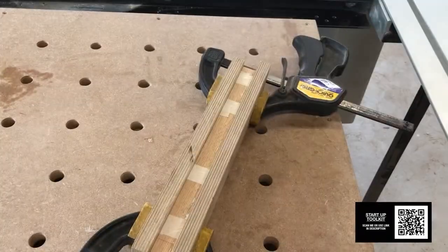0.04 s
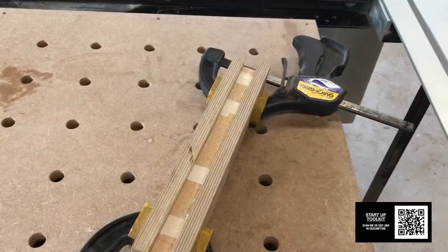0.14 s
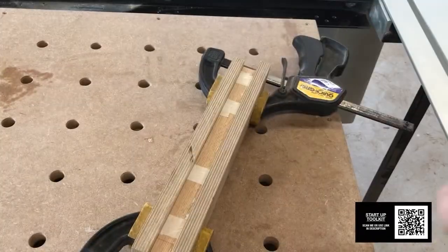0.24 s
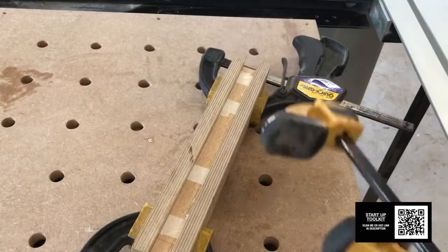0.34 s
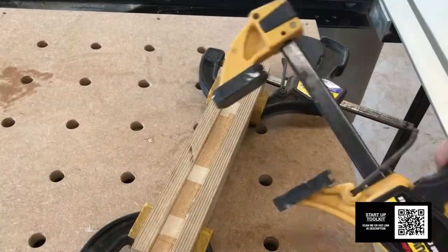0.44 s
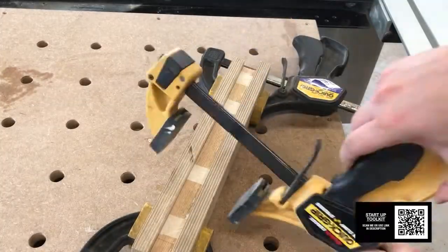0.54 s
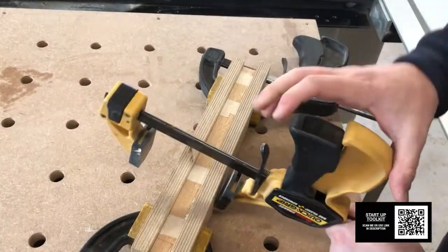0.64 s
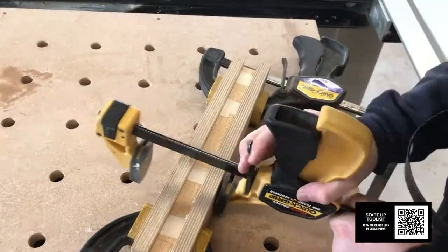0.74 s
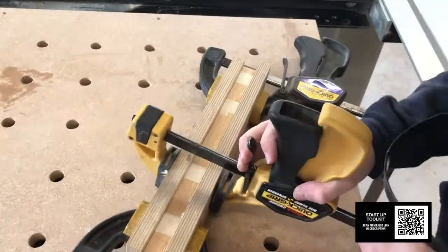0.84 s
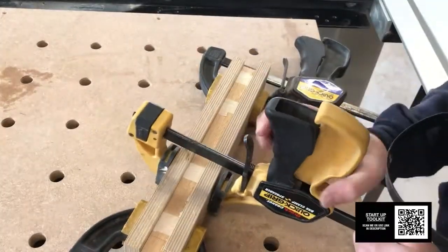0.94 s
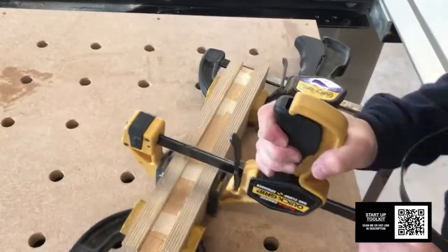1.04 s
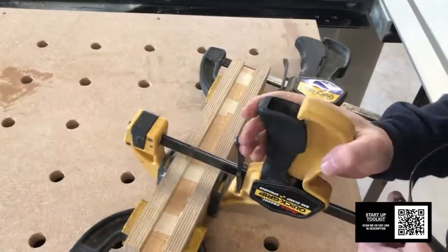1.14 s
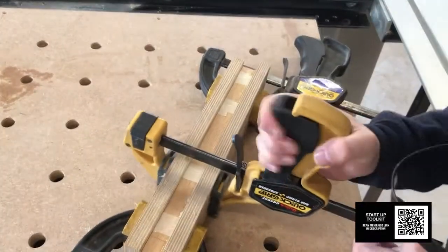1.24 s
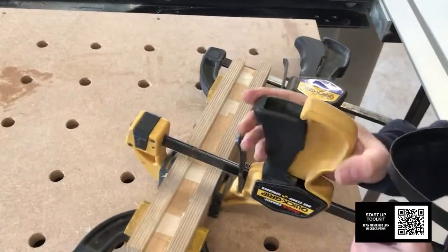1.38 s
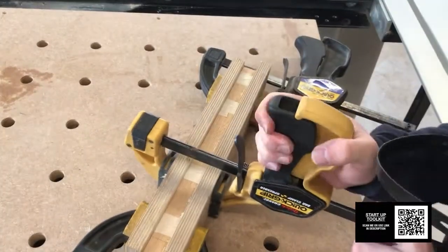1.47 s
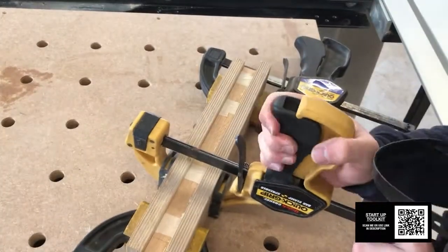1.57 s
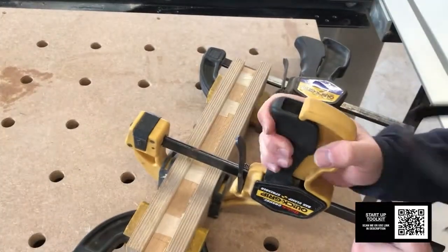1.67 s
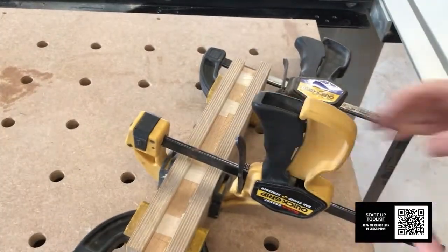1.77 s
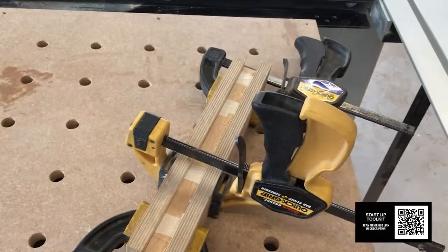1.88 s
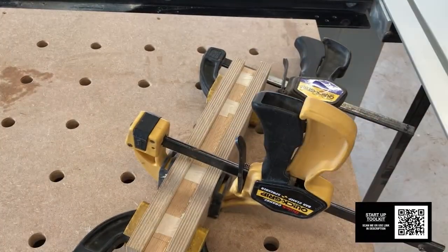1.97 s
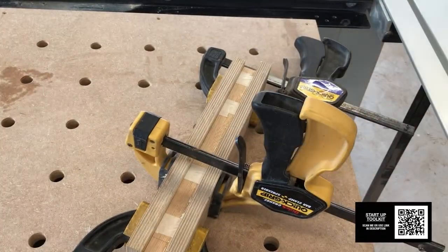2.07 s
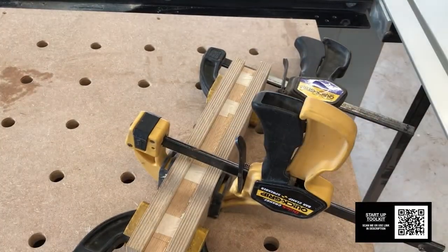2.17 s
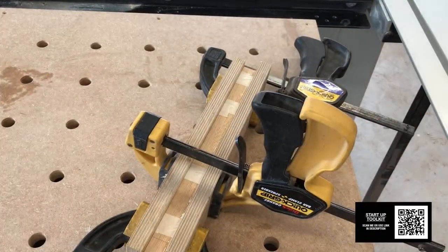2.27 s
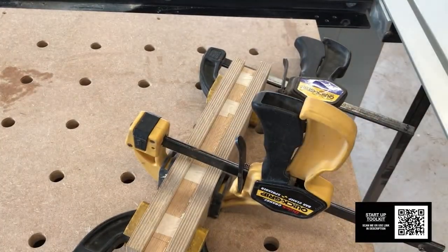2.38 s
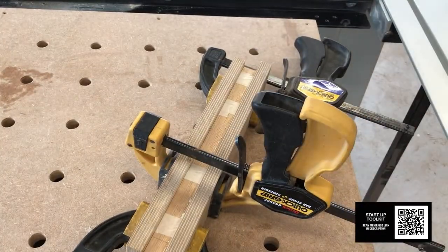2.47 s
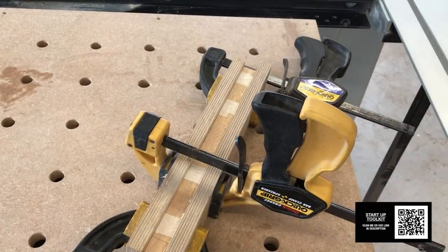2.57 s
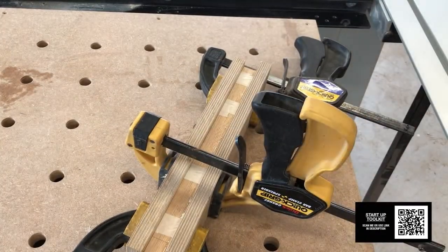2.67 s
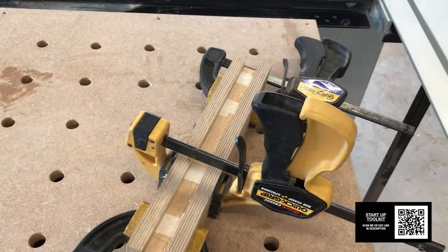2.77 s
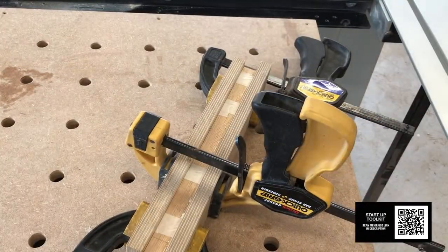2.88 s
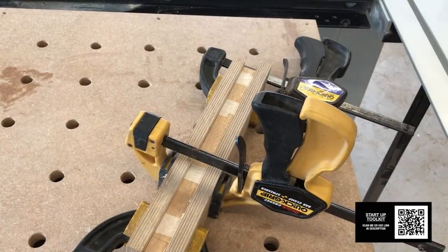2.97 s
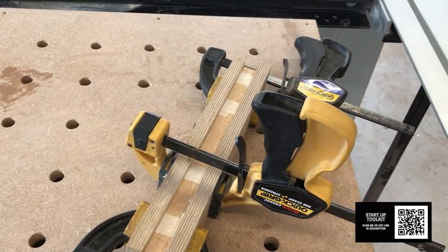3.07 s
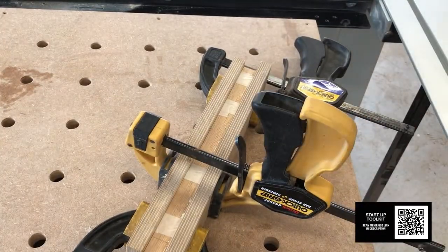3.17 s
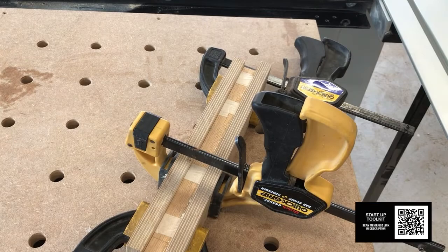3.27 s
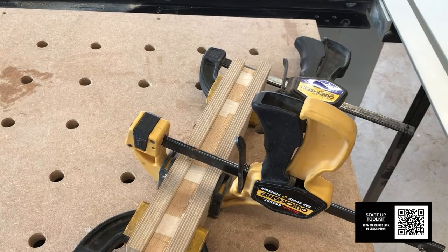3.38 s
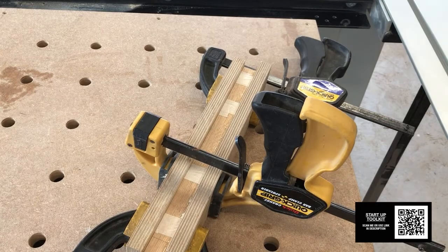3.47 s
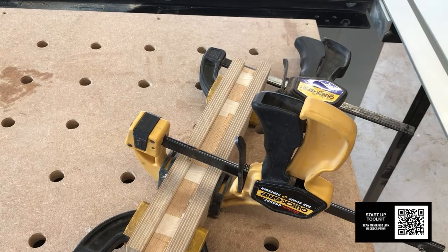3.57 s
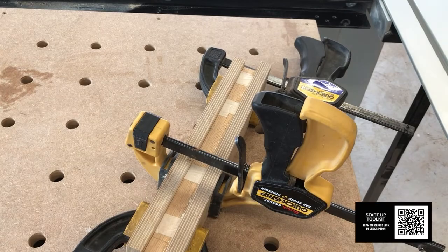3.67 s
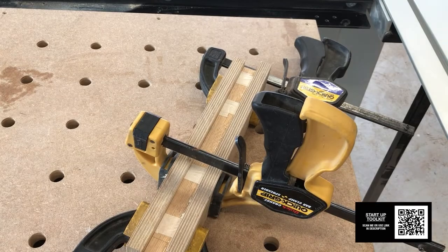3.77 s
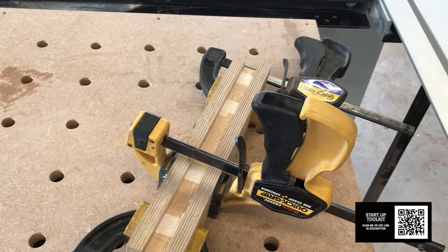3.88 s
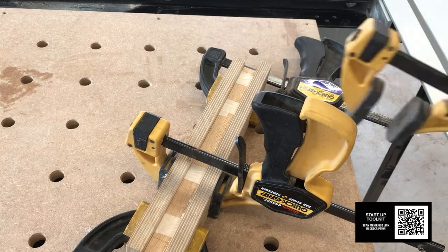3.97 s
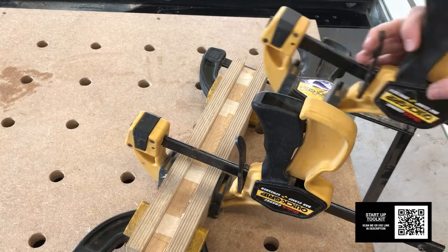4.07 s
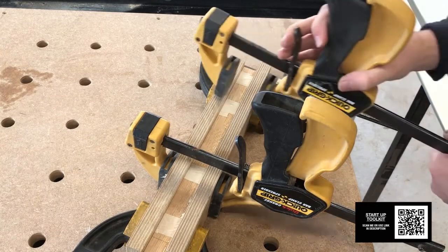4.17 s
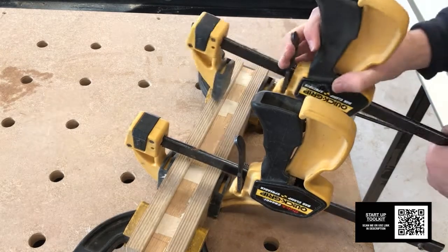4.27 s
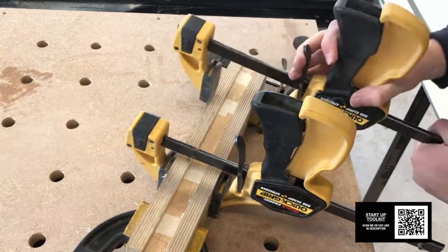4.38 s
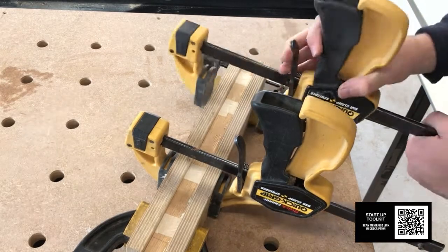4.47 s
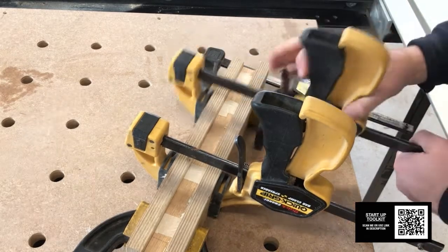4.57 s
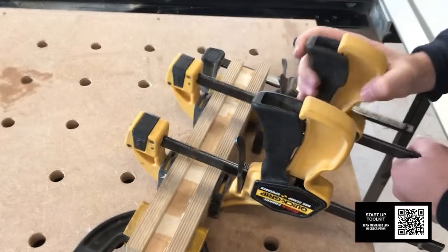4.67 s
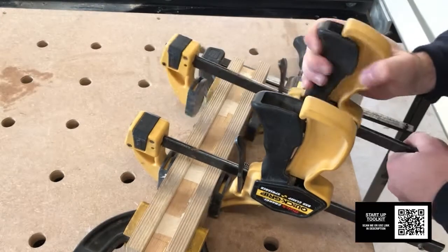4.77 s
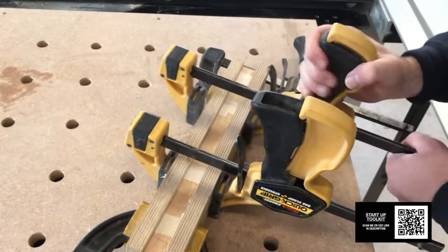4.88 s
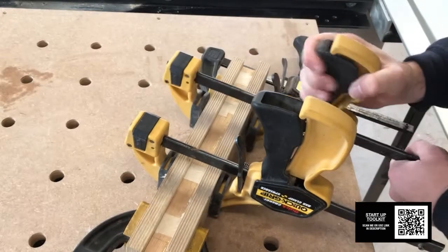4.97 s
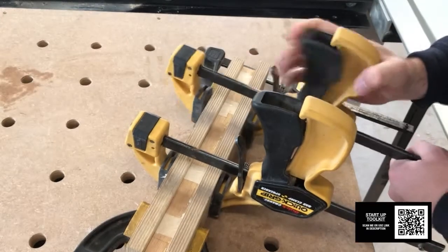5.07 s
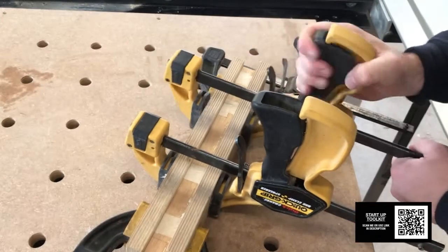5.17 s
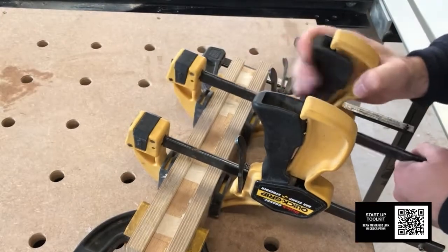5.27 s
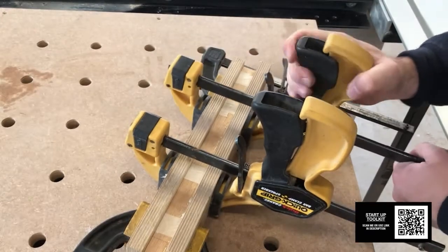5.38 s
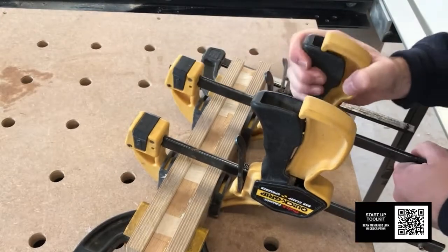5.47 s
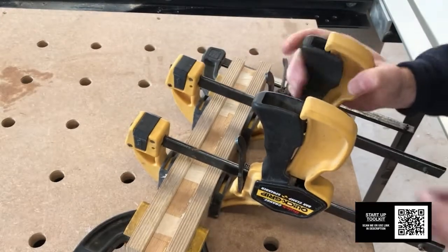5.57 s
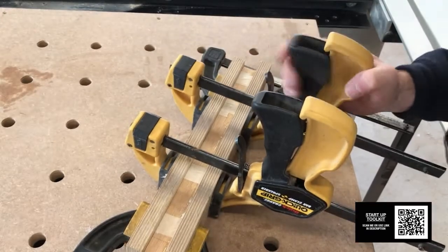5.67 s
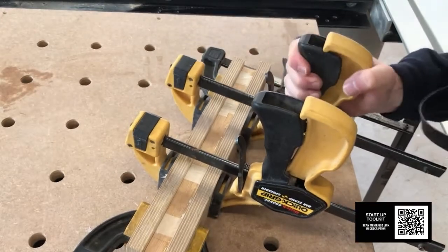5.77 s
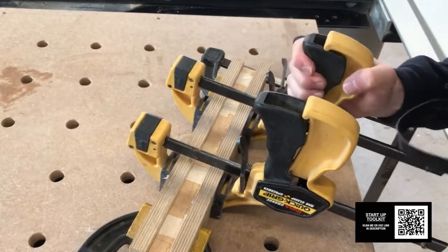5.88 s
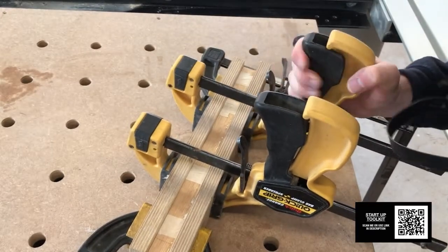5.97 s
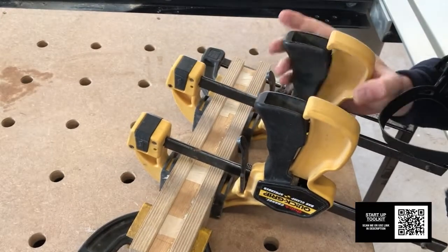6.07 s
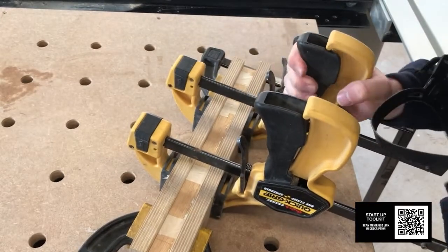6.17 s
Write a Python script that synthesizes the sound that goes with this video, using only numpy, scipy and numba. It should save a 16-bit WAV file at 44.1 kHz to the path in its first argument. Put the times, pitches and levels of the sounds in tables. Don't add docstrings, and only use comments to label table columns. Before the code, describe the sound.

In a quiet workshop, a clamp is handled close to a phone microphone. Small metal ticks and sleeve scuffs lead to woody raps, a brief chirp and one hard, loud clack. It settles into faint rustling, then a second clamp ticks into place and is squeezed with short rubbery squeaks, rattles and knocks. Low room noise and a faint hum continue underneath.

```python
import sys
import numpy as np
from scipy import signal
from scipy.fft import rfft, irfft
from scipy.io import wavfile
from scipy.ndimage import uniform_filter1d
from numba import njit

SR = 44100
rng = np.random.default_rng(int(sys.argv[2]) if len(sys.argv) > 2 else 0)


def dump(signal):
    limited = np.clip(np.atleast_2d(signal).T, -1, 1)
    pcm = np.round(limited * 32767).astype(np.int16)
    wavfile.write(sys.argv[1], SR, pcm)


def amplitude_ratio(level_db):
    exponent = np.asarray(level_db, float) / 20
    return 10 ** exponent


N = 275182


def unit(x):
    return x / np.sqrt(np.mean(x ** 2))


@njit
def svf(x, hz, width):
    y, b, l = np.empty(len(x)), 0., 0.
    for i in range(len(x)):
        g, k = np.tan(np.pi * hz[i] / SR), width[i] / hz[i]
        v = (b + g * (x[i] - l)) / (1 + g * (g + k))
        b, l, y[i] = 2 * v - b, l + 2 * g * v, k * v
    return y


def band(x, hz, width):
    return svf(x, np.clip(hz + 0 * x, 20, .44 * SR), np.clip(width + 0 * x, 1, SR))


def walk(rate):
    k = int(SR / rate)
    steps = np.repeat(rng.standard_normal(N // k + 1), k)
    return 1.977 * uniform_filter1d(uniform_filter1d(steps, k), k)[:N]


def add(out, s, x):
    i = max(int(s * SR), 0)
    out[i:i + len(x)] += x[:N - i]


def curves(table):
    s, *columns = np.transpose(table)
    return [np.interp(np.arange(N) / SR, s, c) for c in columns]


def background():
    # pitch in Hz, level in dB per Hz.
    air_colour = [(65, -31), (110, -1.5), (214, -1.5), (547, -11.5), (1650, -22), (3960, -22.5),
                  (5760, -28), (16000, -29)]
    # time in seconds, level in dB.
    hand_weight = [
        (0.0, -68),
        (0.14, -71),
        (1.58, -63.5),
        (2.2, -83),
        (3.72, -71),
        (4.5, -68),
        (5.54, -63.5),
        (5.72, -57),
        (6.03, -70.5),
        (6.24, -63),
    ]
    # time in
    # seconds, pitch in Hz, level in dB.
    motor = [(0.0, 123.6, -93), (0.6, 129, -81), (0.71, 129.4, -56.5), (0.8, 126.9, -79),
             (1.02, 126.1, -69), (1.65, 121.4, -69.5), (2.08, 131.6, -80), (2.5, 124.2, -71),
             (2.64, 100, -69), (3.1, 84.1, -86), (3.6, 96, -72.5), (4.05, 99.6, -72), (4.19, 95.8, -62.5),
             (4.52, 88.5, -68), (4.62, 88.1, -53), (4.71, 83.4, -68.5), (5.86, 87.3, -64),
             (6.24, 80.9, -67)]

    f, t = np.fft.rfftfreq(N, 1 / SR), np.arange(N) / SR
    colour_hz, colour_level_db = np.array(air_colour).T
    colour_db = np.interp(np.log(f + 1), np.log(colour_hz), colour_level_db)
    air = amplitude_ratio(-70.5) * unit(irfft(rfft(rng.standard_normal(N)) * amplitude_ratio(colour_db), N))

    rumble = np.zeros(N)
    for hz, db in [(190, -7), (300, 0.5), (480, -4.0)]:
        rumble += amplitude_ratio(db + 3.35 * walk(9)) * unit(band(rng.standard_normal(N), hz, 0.29 * hz))
    rumble *= amplitude_ratio(curves(hand_weight)[0] - 5.0)

    hz, hum_db = curves(motor)
    turns = np.cumsum(hz * (1 + 0.018 * walk(9.3))) / SR
    hum = amplitude_ratio(hum_db + 2.3 * walk(36)) * np.sqrt(2) * np.sin(2 * np.pi * turns)
    hum_noise = band(rng.standard_normal(N), 1.15 * hz, 0.29 * hz)
    hum += amplitude_ratio(hum_db - 3) * unit(band(hum_noise, 1.15 * hz, 0.29 * hz))

    frame_hz, frame_db, frame_t60_s = 383, -58, 1.8
    frame = amplitude_ratio(frame_db - 60 * t / frame_t60_s) * np.sin(2 * np.pi * frame_hz * t)
    return air + rumble + hum + frame


def ticks():
    # start in seconds, peak in dB, centre in Hz.
    plate_ticks = [(0.0044, -38, 6700), (0.0252, -30, 8500), (0.0992, -29, 6730), (0.5361, -52.5, 5700),
                   (0.8125, -42, 6250), (1.4194, -33, 5200), (1.5288, -53.5, 4430), (2.2583, -60, 6900),
                   (3.8896, -34.5, 13090), (4.3182, -41.5, 6500), (5.0863, -24.5, 7600),
                   (5.534, -39.5, 4950), (5.5863, -31.5, 4100), (5.5978, -32, 4300), (5.484, -55, 3200),
                   (5.752, -51, 5800), (5.7584, -52, 3860), (5.7803, -41.5, 4800), (5.8479, -49, 5270),
                   (6.016, -32, 5600)]
    # start in seconds, peak in dB, centre in Hz.
    lever_ticks = [(0.195, -41.5, 8900), (0.621, -47, 8600), (0.7282, -44.5, 4830), (0.7344, -43.5, 6540),
                   (0.999, -41, 5500), (1.177, -58, 5200), (1.185, -37, 5080), (1.2064, -48, 5730),
                   (1.237, -46, 8100), (1.3047, -33.5, 4300), (1.3563, -27.5, 8900), (1.7106, -28.5, 8800),
                   (1.8477, -58.5, 4580), (2.621, -37.5, 2500), (2.629, -35, 2400), (3.8944, -41, 13900),
                   (4.5498, -50, 3900), (4.7083, -47, 6300), (5.0556, -40, 7200), (5.0662, -41, 3940),
                   (5.1628, -25, 8000), (5.2624, -42, 7340), (5.2812, -34, 3950), (5.321, -45, 6100),
                   (5.678, -51, 6450), (5.693, -47, 6990), (6.1521, -46.5, 5530)]
    # start in seconds, peak in dB, centre in Hz.
    bar_ticks = [(0.218, -48, 4100), (0.3141, -36.5, 5000), (0.6927, -49, 4910), (0.703, -53, 6070),
                 (1.005, -35, 5000), (1.0946, -31, 4160), (1.1329, -40.5, 5500), (1.256, -12, 5000),
                 (1.3438, -45, 5000), (1.6538, -43.5, 4430), (2.7985, -51.5, 8770), (3.575, -53, 5680),
                 (3.776, -47, 4830), (3.8296, -44, 4320), (3.8638, -44.5, 7000), (4.1962, -37.5, 6500),
                 (4.218, -42.5, 6840), (4.3562, -44.5, 4440), (4.4609, -40, 6450), (4.578, -30, 8700),
                 (4.6044, -42.5, 7200), (4.8904, -41, 7400), (4.9569, -48.5, 3850), (4.9621, -29, 8400),
                 (5.0618, -38, 3850), (5.0843, -32.5, 5060), (5.1516, -35, 7360), (5.1766, -22.5, 3900),
                 (5.3576, -60, 6290), (5.372, -37, 6600)]

    out, t = np.zeros(N), np.arange(SR // 20) / SR
    shape = np.exp(-np.log(1000) * t / .0055) * (1 - np.exp(-t / .0003))
    kinds = (plate_ticks, -28.5), (lever_ticks, -13.5), (bar_ticks, -3)
    for table, crack_db in kinds:
        for s, db, hz in table:
            impacts = rng.standard_normal(len(t)) * shape
            ring = band(impacts, hz, .25 * hz)
            crack = band(impacts, 4200.0, 6700.0)
            tick = ring + amplitude_ratio(crack_db) * crack
            add(out, s, amplitude_ratio(db) * tick / abs(tick).max())
    return out


def scuffs():
    # loudest moment in seconds, level in dB,
    # strongest pitch in Hz, length in ms.
    brushes = [(0.627, -69, 6540, 21), (0.751, -67, 6000, 79), (0.798, -62.5, 5960, 65),
               (0.958, -74, 8100, 25), (1.951, -65, 5500, 52), (2.008, -65.5, 3900, 64),
               (2.191, -64, 4000, 75), (2.28, -78, 7900, 70), (2.595, -59.5, 3600, 53),
               (2.627, -55.5, 2620, 111), (3.315, -61.5, 3460, 49), (3.446, -63, 3230, 117),
               (3.812, -61.5, 4500, 71), (3.889, -56.5, 11000, 63), (4.30, -62, 3400, 46),
               (6.003, -64.5, 2720, 180)]
    # loudest moment in seconds, level in dB,
    # strongest pitch in Hz, length in ms.
    flicks = [(.01, -52.5, 6200, 23.5), (.165, -79, 9000, 64), (0.351, -74.5, 5770, 320),
              (1.633, -71, 6040, 170), (2.134, -74, 6160, 92), (2.358, -68.5, 4500, 105),
              (2.805, -61.5, 6100, 56), (3.11, -71, 3000, 69), (3.164, -75, 6170, 140),
              (3.665, -57.5, 5100, 80), (4.106, -57.5, 6240, 68), (4.466, -63, 6200, 14),
              (4.588, -65, 8060, 76)]
    # loudest moment in seconds, level in dB,
    # strongest pitch in Hz, length in ms.
    drags = [
        (0.073, -54, 6500, 73),
        (1.769, -72, 6000, 230),
        (3.40, -73, 6140, 320),
        (3.958, -60.5, 4800, 126),
        (4, -73, 2870, 110),
        (4.348, -58, 6500, 43),
    ]
    # loudest moment in seconds, level in dB,
    # strongest pitch in Hz, length in ms.
    rubs = [
        (.885, -73, 5000, 39),
        (1.33, -73, 4500, 115),
        (2.876, -65, 4500, 93),
        (4.209, -64, 6100, 53),
        (5.608, -70.5, 5000, 95),
        (5.7, -65.5, 3970, 44),
        (6.188, -72, 3500, 210),
    ]
    # share of the length spent rising from 0 to 1, dull part in dB.
    scuff_kinds = [
        (.43, -35.5),
        (0.25, -24.5),
        (0.72, -22),
        (0.57, 2.5),
    ]

    out, t = np.zeros(N), np.arange(-SR // 5, SR // 4) / SR
    grain_db = 1.8 * np.resize([walk(500), walk(150), walk(60)], (3, N + SR))
    grain = rng.standard_normal((3, N + SR)) * amplitude_ratio(grain_db)
    broad = unit(band(band(grain[0], 6300.0, 24000.0), 4700.0, 18000.0))
    dull = unit(band(grain[2], 1100., 2100.0))
    for table, (rising, dull_db) in zip((brushes, flicks, drags, rubs), scuff_kinds):
        for s, db, hz, length_ms in table:
            rise_ms, fall_ms = rising * length_ms, (1 - rising) * length_ms
            span = slice(int(s * SR), int(s * SR) + len(t))
            from_crest = abs(1000 * t / np.where(t < 0, rise_ms, fall_ms))
            swell = amplitude_ratio(db - 20 * from_crest ** 1.5)
            hump = amplitude_ratio(-0.5) * unit(band(band(grain[1, span], hz, .45 * hz), hz, .55 * hz))
            x = swell * (broad[span] + hump + amplitude_ratio(dull_db) * dull[span])
            skip = max(SR // 5 - int(s * SR), 0)
            add(out, s + t[skip], x[skip:])
    return out


def knocks():
    # start in seconds, peak in dB, strongest ring in Hz,
    # brightness in dB per octave.
    raps = [(0.629, -43.5, 385, -2.5), (0.734, -46, 422, 3), (0.815, -34, 446, -1), (1.004, -38, 374, 3),
            (1.025, -42, 395, -1.5), (1.095, -26, 910, 3), (1.256, -13.5, 917, -4.5),
            (1.306, -27, 1055, 3.5), (1.418, -35.5, 733, -5), (1.654, -32.5, 1000, 6), (2.571, -54, 247, 0),
            (2.619, -43.5, 1600, 3), (4.603, -30, 520, -0.5), (4.706, -40, 540, -1), (4.82, -35, 595, -1),
            (4.898, -43.5, 574, -19), (4.999, -38, 308, -0.5), (5.2, -38.5, 1144, 3),
            (5.187, -43, 546, -24), (5.12, -53, 262, -13), (5.278, -50.5, 338, -21), (5.412, -33.5, 617, 3),
            (5.534, -26, 620, 1), (5.586, -42, 850, 4), (5.781, -25.5, 814, 0), (5.85, -32.5, 615, -1)]
    # start in seconds, peak in dB,
    # strongest ring in Hz, brightness in dB per octave.
    bumps = [(0.69, -37, 520, -3.5), (0.795, -39.5, 1018, -11), (1.184, -44, 401, 1),
             (1.711, -45.5, 425, 4), (2.799, -52, 760, -9), (2.815, -44, 200, -12.5),
             (4.197, -38.5, 190, -1.5), (4.206, -41, 288, 1), (4.321, -40.5, 277, 3),
             (4.548, -40.5, 528, -8), (4.578, -37.5, 275, 0), (5.699, -46.5, 520, -4.5),
             (6.016, -48, 260, 0), (6.151, -49, 516, 3.5)]
    # pitch in Hz, level in dB, time to fade by 60 dB in seconds.
    bench = [(365.3, -2.5, 0.2), (525.6, 0.5, 0.072), (599.6, -3, 0.081), (724, 5, 0.022),
             (924, -0.5, 0.086), (1093, -1.5, 0.013), (1150, -4, 0.048), (1335, -8, 0.055),
             (1407, -11.5, 0.026)]

    out, t = np.zeros(N), np.arange(SR // 5, dtype=np.float32) / SR
    bench_hz, bench_db, bench_t60 = np.array(bench, float).T
    plate_hz = np.geomspace(200, 4500, num=90)
    plate_t60 = .11 * (plate_hz / 600) ** -.5
    hz = np.r_[bench_hz, plate_hz][:, None]
    mode_db = np.r_[bench_db, -11 + 0 * plate_hz][:, None]
    t60 = np.r_[np.clip(bench_t60, .02, .15), plate_t60][:, None]
    blows = [(*r, 0.74) for r in raps] + [(*r, 1.41) for r in bumps]
    for s, db, own_hz, bright_db, ring in blows:
        strike, detune, start = rng.standard_normal((3, len(hz), 1))
        octaves = np.log2(hz / own_hz)
        tilt_db = np.where(octaves > 0, min(bright_db, 3) * octaves, 5.43 * octaves)
        tilt_db -= 9.0 * np.maximum(np.log2(hz / 2000), 0)
        tilt_db -= 20 * np.maximum(-1.1 - octaves, 0)
        level = amplitude_ratio(mode_db + tilt_db + 3 * strike)
        fade = np.exp(np.float32(-np.log(1000) / (t60 * ring)) * t)
        angle = np.float32(2 * np.pi * hz * (1 + 0.019 * detune)) * t + np.float32(1.5 * start)
        body = (level * fade * np.sin(angle)).sum(axis=0)
        own_fade = np.exp(-np.log(1000) * t / (.07 * ring))
        body += amplitude_ratio(1.0) * own_fade * np.sin(2 * np.pi * own_hz * t)
        body *= 1 - np.exp(-(t / .0012) ** 2)
        add(out, s, amplitude_ratio(db) * body / abs(body).max())
    return out


def squeaks():
    # time in seconds, slips in Hz,
    # level in dB.
    chirps = [
        [(1.014, 2474, -46), (1.018, 2183, -34.5), (1.023, 2120, -38.5), (1.028, 2137, -47), (1.04, 2140, -63)],
        [(2.63, 922, -70), (2.648, 960, -48), (2.665, 950, -62)],
        [(2.855, 1697, -63), (2.868, 1793, -57), (2.885, 1690, -68)],
        [(6.175, 3940, -68), (6.195, 3940, -74), (6.238, 3850, -79)],
        [(5.384, 1644, -44), (5.39, 1440, -44.5), (5.396, 1493, -52), (5.406, 1406, -48.5), (5.42, 1440, -50.5),
         (5.47, 1450, -64)],
    ]
    # time in seconds,
    # slips in Hz, level in dB, roughness from 0 to 1.
    strokes = [
        [(4.782, 1599, -53, 0.06), (4.787, 1508, -34.5, .12), (4.80, 1455, -43, 0.07), (4.81, 1756, -39, 0),
         (4.815, 1175, -35.5, 0.85), (4.821, 970, -43, 0.5), (4.83, 914, -47, 0.2)],
        [(4.975, 1958, -62, 0.1), (4.981, 1468, -38, 0.2), (4.988, 977, -34.5, 0.71), (4.998, 866, -46.5, 0.2)],
        [(5.168, 1482, -48, 0.1), (5.177, 1359, -51, 0.38), (5.183, 1640, -41, 0.03), (5.189, 1515, -40, 0.18),
         (5.194, 1237, -29, 0.08), (5.2, 1104, -39, 0.37), (5.208, 1170, -56, 0.6)],
    ]
    # pitch in Hz, width in Hz, level in dB.
    pad_rings = [(1470, 670, -1), (3000, 150, -19), (3500, 860, 8), (4500, 1090, -1.5), (6500, 2470, 3.5),
                 (8700, 2300, -7.5), (9000, 2000, 1.5), (11860, 1700, 5)]

    out, k = np.zeros(N), np.arange(1, 13)[:, None]
    chirp_rough = .06
    for table in [[(*r, chirp_rough) for r in chirp] for chirp in chirps] + strokes:
        s, *columns = np.transpose(table)
        t = np.arange(s[0], s[-1], 1 / SR)
        hz, db, rough = (np.interp(t, s, c) for c in columns)
        rough = np.clip(rough, 0, 1)
        jitter, noise = rng.standard_normal((2, SR // 8))[:, :len(t)]
        uneven = (.24 + .5 * rough) * uniform_filter1d(jitter, size=60)
        phase = np.cumsum(hz * (1 + uneven)) / SR
        flicker = np.sqrt(90) * uniform_filter1d(rng.standard_normal((len(k), SR // 8)), size=90)[:, :len(t)]

        tilt_db = np.minimum(.5 * (db + 26), -4)
        load = np.clip((db + 60) / 14, 0, 1)
        weak_db = 12 * load * np.maximum(np.log2(2200 / (k * hz)), 0)
        weak_db += np.maximum(-32 - db, 0) * np.maximum(np.log2(k * hz / 5000), 0)
        weak_db += 2.5 * flicker
        overtone_level = (k * hz < 17000) * amplitude_ratio(tilt_db * np.log2(k) - weak_db)
        slips = (np.cos(2 * np.pi * k * phase) * overtone_level).sum(axis=0)

        hiss = noise * np.exp(-(phase % 1) / .7)
        hiss = unit(hiss - uniform_filter1d(hiss, size=14))
        ends = np.clip(np.minimum(t - s[0], s[-1] - t) / .003, 0, 1)
        drive = ends * (slips + 3.9 * rough * load ** 2 * hiss)
        ringing = sum(amplitude_ratio(ring_db) * band(drive, f, width) for f, width, ring_db in pad_rings)
        add(out, s[0], amplitude_ratio(db + 1.5) * ringing)
    return out


def room(x):
    low_t60_s, high_t60_s, echo_db, gap_s = 0.18, 0.16, -10.5, 0.0011
    t = np.arange(SR // 2) / SR
    c = rng.standard_normal(len(t))
    low = uniform_filter1d(c, size=16)
    tail = low * amplitude_ratio(-60 * t / low_t60_s + 2.5) + (c - low) * amplitude_ratio(-60 * t / high_t60_s)
    tail *= 1 - np.exp(-(t / gap_s) ** 2)
    tail /= np.sqrt(np.sum(tail ** 2))
    return x + amplitude_ratio(echo_db) * signal.fftconvolve(x, tail)[:N]


def scene():
    steady = background()
    handling = ticks() + scuffs() + knocks() + squeaks()
    return (room(handling) + steady)[None]


def top_cut(x):
    return signal.sosfilt(signal.butter(12, 17040, fs=SR, output="sos"), x)


def record(dry):
    low_cut_hz, top_hz, ceiling = 98, 16200, .3
    cut = signal.sosfilt(signal.butter(4, low_cut_hz, "high", fs=SR, output="sos"), dry)
    cut = ceiling * np.tanh(cut / ceiling)
    cut = signal.sosfilt(signal.cheby1(6, .5, top_hz, fs=SR, output="sos"), cut)
    return top_cut(cut)


dry = scene()
out = record(dry)
dump(out)
```